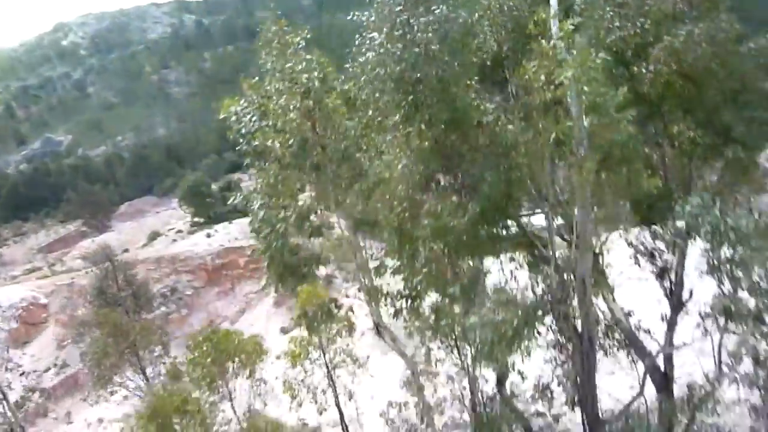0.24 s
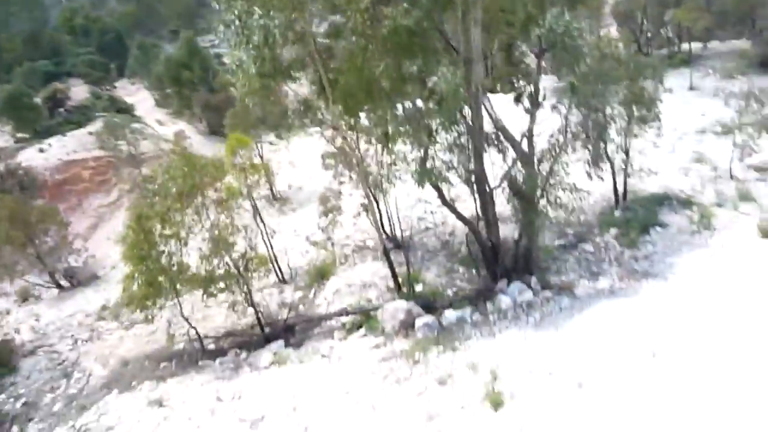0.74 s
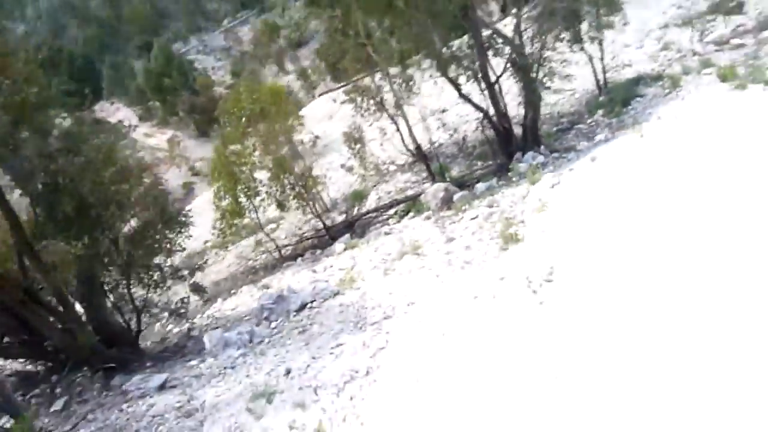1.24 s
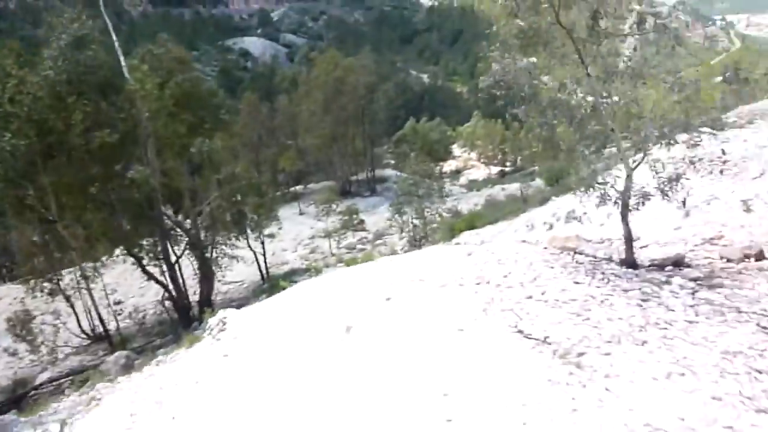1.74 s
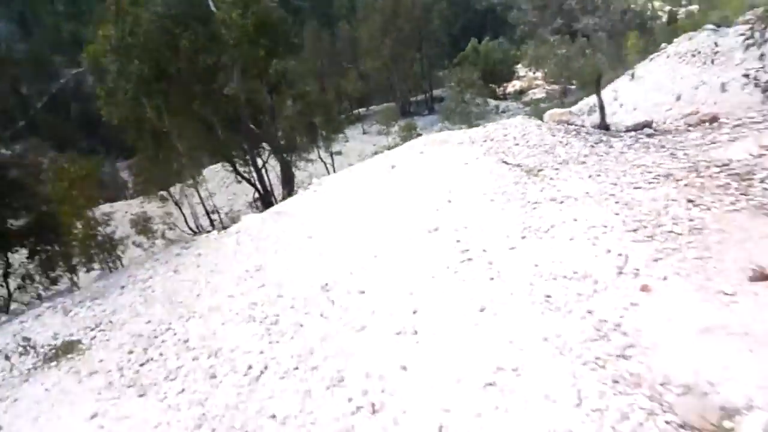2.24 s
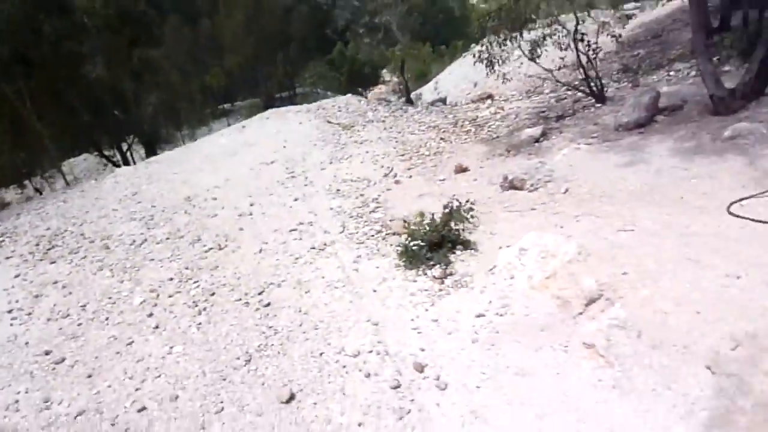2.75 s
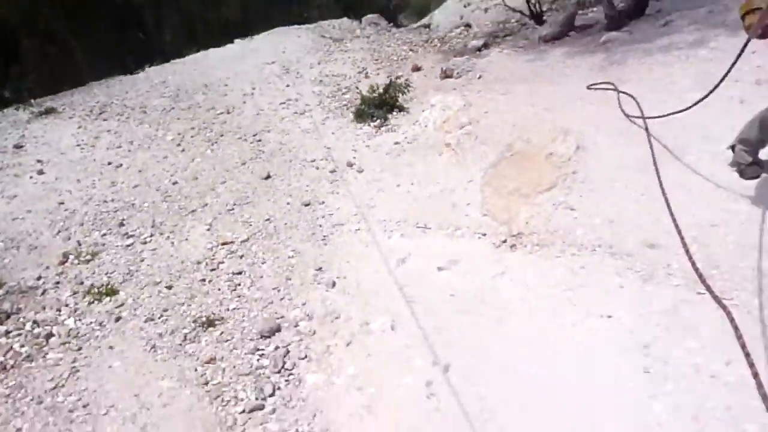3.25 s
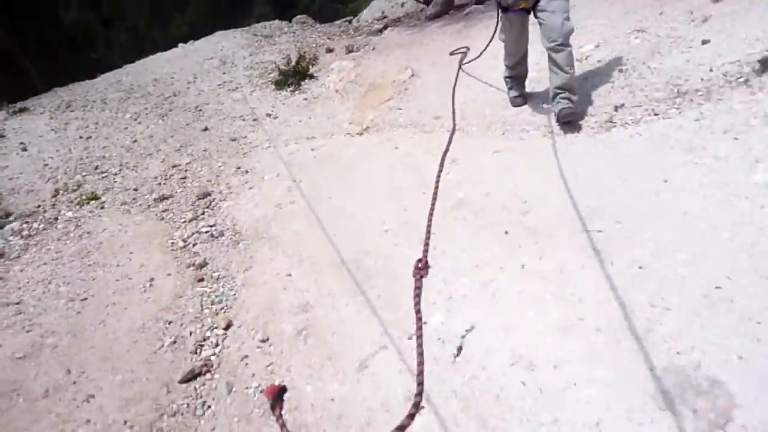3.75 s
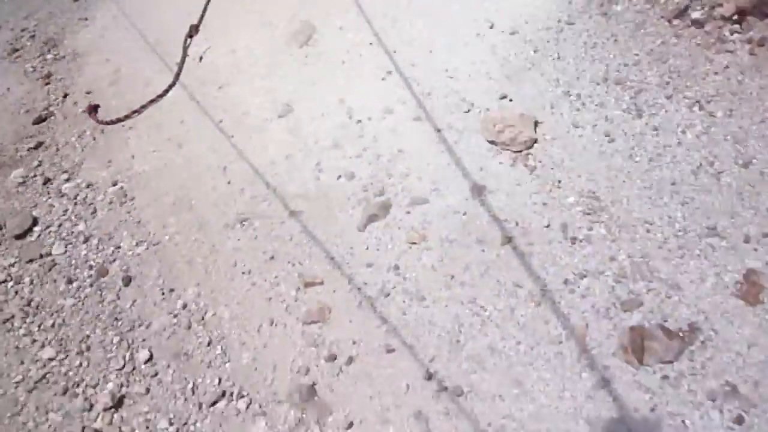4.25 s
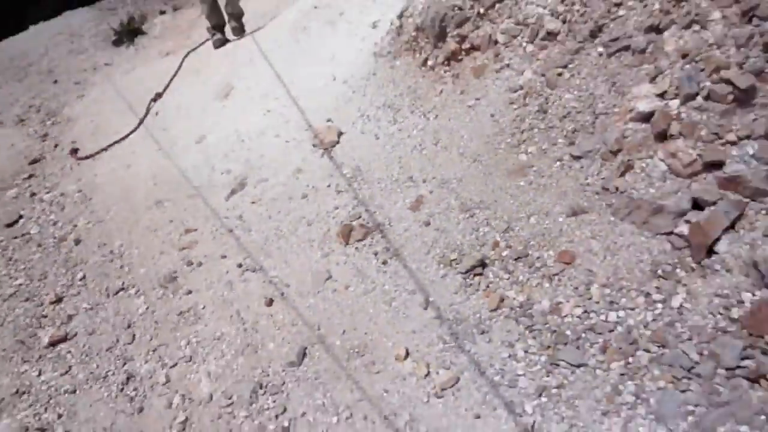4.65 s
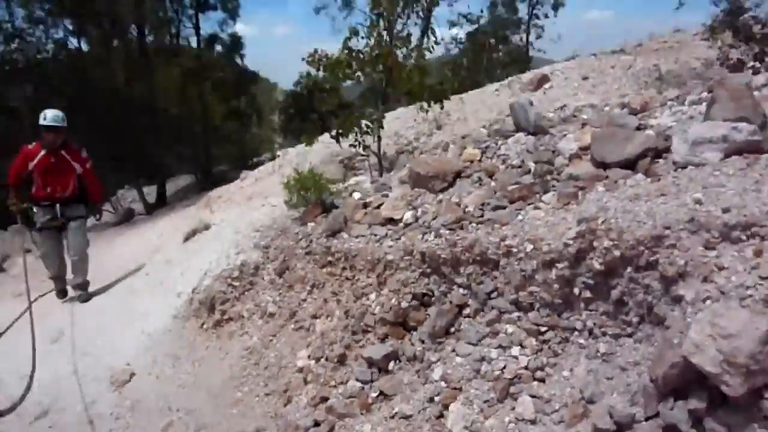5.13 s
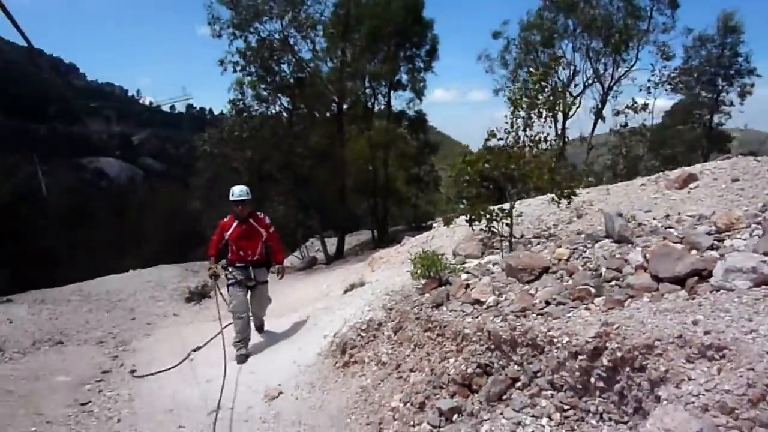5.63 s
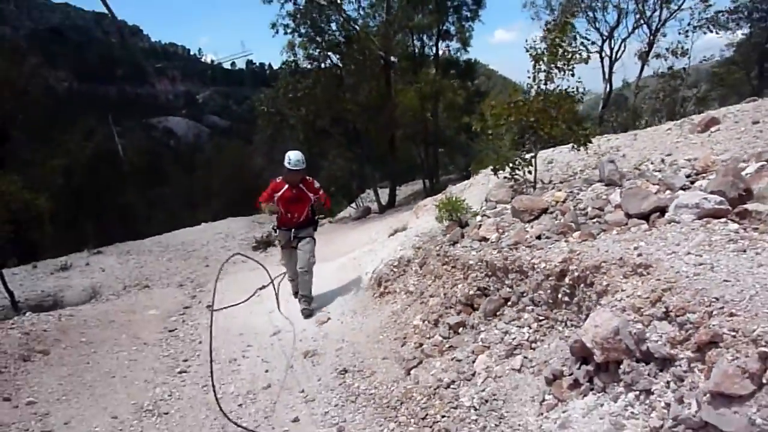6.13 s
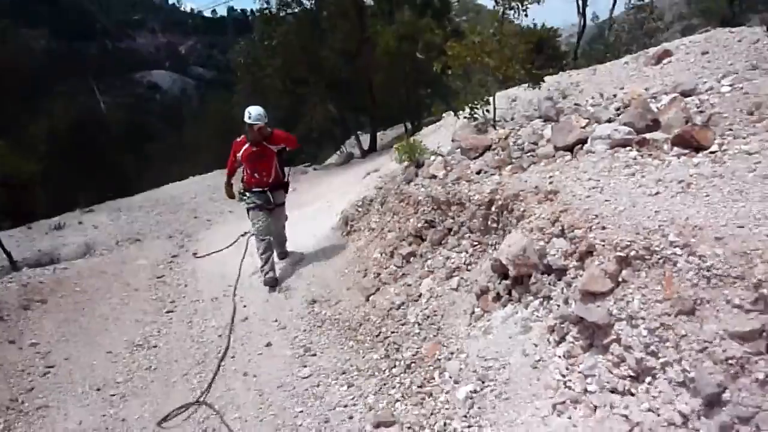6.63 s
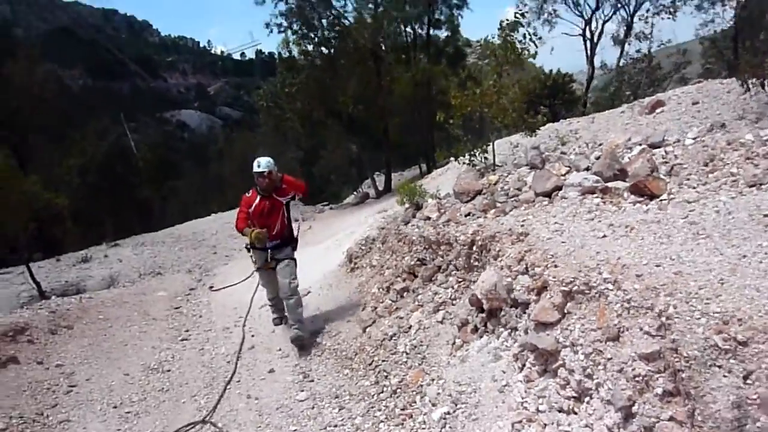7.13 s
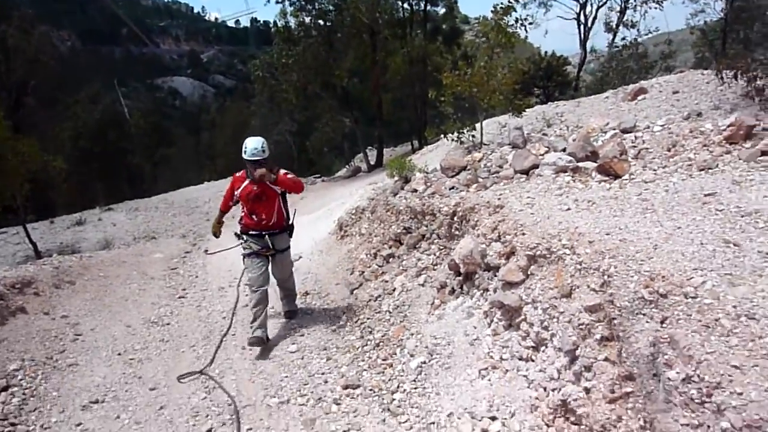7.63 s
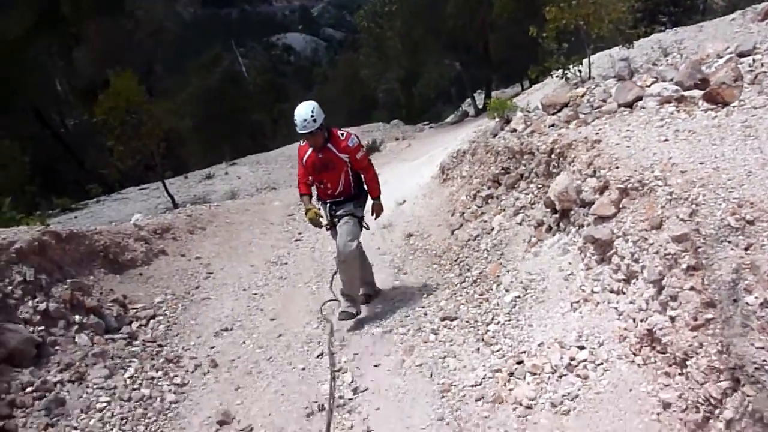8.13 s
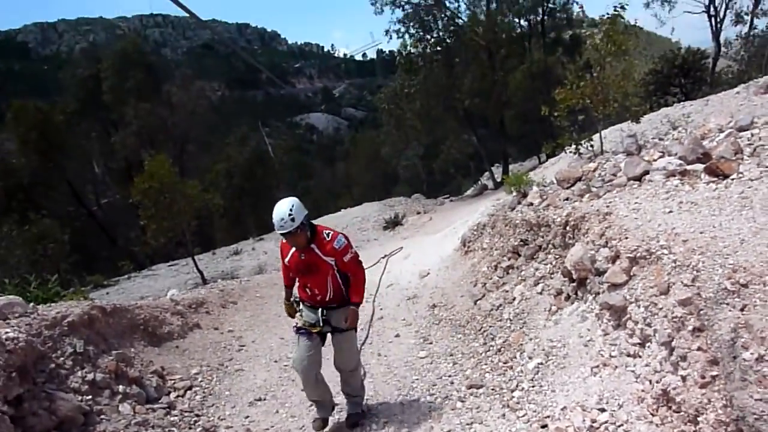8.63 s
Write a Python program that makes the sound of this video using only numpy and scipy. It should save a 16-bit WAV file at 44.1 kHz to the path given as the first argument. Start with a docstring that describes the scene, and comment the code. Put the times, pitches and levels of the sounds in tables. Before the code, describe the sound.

Close to the microphone, a metal pulley trolley runs fast on a stranded cable with a bright rasping hiss and a falling whine. Wind buffets in lumps, then eases. Thin high squeaks appear, loose harness gear rattles dully, and the rolling slows to a grainy ratchet. Wind returns while single clicks and hollow tocks end the ride on an open hillside.

```python
"""A pulley trolley slows down along a stranded steel cable, close to a two-port microphone.
From the start its sheaves bump over the strands: a falling whine of harmonics and a rasp of pulsed noise and dense
ticks through steel resonances. Gusty wind, lumpy filtered noise, buffets the ports and then eases. From 2.2 s wavering
sines squeak on the rims, and rough contact rings now and then; from 4.1 to 4.9 s harness gear rattles on the camera
body in dull thuds. The wind is back at 6.1 s, and slow rolling ends in single noise clicks and hollow frame tocks."""
import sys
import numpy as np
from scipy import signal
from scipy.fft import rfft, irfft, next_fast_len
from scipy.io import wavfile
from scipy.ndimage import uniform_filter1d, map_coordinates

SR = 44100
rng = np.random.default_rng(int(sys.argv[2]) if len(sys.argv) > 2 else 0)


def dump(signal):
    """Clip the signal to [-1, 1] and save it as 16-bit WAV at the path in sys.argv[1]."""
    limited = np.clip(np.atleast_2d(signal).T, -1, 1)
    pcm = np.round(limited * 32767).astype(np.int16)
    wavfile.write(sys.argv[1], SR, pcm)


def volts_from_db(level):
    """Convert decibel levels to linear amplitude ratios."""
    exponent = np.asarray(level, float) / 20
    return 10 ** exponent


N = 391608

# trolley speed counted in strands crossed: time_s, strands_per_s
STRAND_SPEED = [(0, 410), (.65, 400), (.85, 388), (1.08, 380), (1.17, 384), (1.25, 352), (1.32, 343),
                (1.42, 362), (1.55, 352), (1.62, 340), (1.75, 358), (1.9, 347), (2.09, 342), (2.38, 320),
                (2.5, 312), (2.6, 318), (2.67, 300), (2.8, 317), (2.9, 303), (2.97, 288), (3.05, 270),
                (3.13, 290), (3.2, 271), (3.3, 298), (3.38, 287), (3.52, 256), (3.55, 268), (3.6, 302),
                (3.65, 315), (3.69, 295), (3.74, 236), (3.77, 220), (3.89, 251), (3.96, 229), (4.05, 224),
                (4.18, 210), (4.3, 222), (4.45, 231), (4.55, 205), (4.68, 172), (4.77, 179), (4.9, 146),
                (5.05, 143), (5.12, 136), (5.22, 145), (5.32, 121), (5.45, 126), (5.6, 120), (5.8, 123),
                (6.1, 102), (6.2, 105), (6.6, 70), (7.05, 40), (8.88, 35)]
# how hard the sheaves press as the rider bounces and swings: time_s, rasp_db
SHEAVE_PRESS = [(0, -29.5), (.7, -28), (.95, -30.5), (1.21, -28), (1.75, -25), (2.0, -24.5), (2.03, -32),
                (2.06, -21.5), (2.16, -25.5), (2.19, -30), (2.23, -23), (2.4, -27.5), (2.94, -25),
                (3.5, -25), (3.63, -22), (3.73, -28), (3.88, -25), (4.15, -28), (4.5, -25), (4.82, -30),
                (5.05, -30.5), (5.25, -28.5), (5.45, -25.5), (5.6, -24), (5.84, -24.5), (6.08, -30),
                (6.23, -22.5), (6.43, -30.5), (6.65, -26.5), (6.85, -29.5), (7.0, -31), (7.07, -39),
                (7.25, -38), (7.4, -39.5), (7.54, -31.5), (7.76, -45), (8.01, -36), (8.2, -54), (8.38, -43),
                (8.56, -46.5), (8.66, -36), (8.88, -40.5)]


def unit(x):
    """Scale to rms 1."""
    return x / np.sqrt(np.mean(x ** 2, axis=-1, keepdims=True) + 1e-20)


def along(points, hz):
    """Read (Hz, value) points on a log frequency axis."""
    f, v = np.transpose(points)
    return np.interp(np.log(hz + 1), np.log(f + 1), v)


def curves(rows):
    """One value per sample for each column after the time."""
    s, *cols = np.transpose(rows)
    return [np.interp(np.arange(N) / SR, s, c) for c in cols]


def wobble(rate):
    """A smooth random curve, rate knots a second."""
    knots = rng.standard_normal(int(N * rate / SR) + 4)
    return map_coordinates(knots, [np.arange(N) * rate / SR])


def sides(pan_db):
    """Gains of the left and right port that lie pan_db apart."""
    return volts_from_db(np.array([pan_db, -pan_db]) / 2)


def filtered(x, response):
    """Apply a complex response of frequency to x."""
    m = next_fast_len(x.shape[-1] + 8192)
    return irfft(rfft(x, m) * response(np.fft.rfftfreq(m, 1 / SR)), m)[..., :x.shape[-1]]


def band(x, lo_hz, hi_hz):
    """Soft-edged band."""
    return filtered(x, lambda hz: 1 / np.sqrt((1 + (lo_hz / (hz + 1)) ** 8) * (1 + (hz / hi_hz) ** 16)))


def smooth_field(shape, bins, frames):
    """Random values over frequency and time, averaged over neighbouring bins and frames."""
    field = uniform_filter1d(rng.standard_normal(shape), size=bins, axis=0)
    field = uniform_filter1d(field, size=frames, axis=1)
    return field / field.std()


def gusts():
    """Wind strength and side: the steady wind plus bell-shaped gusts, added as power."""
    # steady wind on the ports: time_s, buffet_db
    steady_wind = [(0, -26), (.33, -23.5), (.62, -30), (.9, -28), (1.02, -30), (1.09, -51), (1.16, -45),
                   (1.3, -37.5), (1.56, -50), (1.64, -29), (1.685, -37), (1.72, -34.5), (2.02, -32.5),
                   (2.1, -68), (2.3, -40.5), (2.8, -48), (3.07, -69), (3.15, -42.5), (3.36, -44.5),
                   (3.5, -67), (4.1, -56), (4.5, -52), (5.0, -56), (5.94, -54.5), (6.1, -40.5), (6.3, -25),
                   (6.92, -27), (7.05, -49.5), (7.3, -31), (7.7, -30), (8.0, -29.5), (8.11, -36.5),
                   (8.18, -25.5), (8.7, -25.5), (8.77, -35), (8.88, -21.5)]
    # single gusts: time_s, peak_db, length_s (full width at 1/e of the power), left_minus_right_db
    gust_rows = [(0.416, -22.5, 0.021, -10), (0.759, -23.5, 0.052, -7), (0.885, -23, 0.031, 6),
                 (0.949, -23.5, 0.037, 2), (1.058, -25, 0.025, -1), (1.123, -29, 0.036, -2),
                 (1.191, -33, 0.042, -1), (1.358, -21.5, 0.029, 8), (1.482, -31, 0.027, 7),
                 (1.619, -22, 0.028, 0), (1.727, -25, 0.025, 4), (1.775, -23, 0.027, 4),
                 (1.921, -18, 0.015, 2), (2.227, -29.5, 0.031, -3), (2.317, -27.5, 0.017, 7),
                 (2.443, -23.5, 0.036, 7), (2.606, -27.5, 0.06, 5), (2.726, -36.5, 0.085, -3),
                 (3.54, -50, 0.035, 0), (3.753, -52, 0.08, 2), (5.324, -54, 0.085, -8),
                 (5.76, -49, 0.046, -6), (6.007, -41, 0.056, 7.5), (6.238, -26.5, 0.068, 2),
                 (6.69, -28, 0.036, -13), (6.776, -24, 0.046, -8), (6.86, -38, 0.027, -5),
                 (7.305, -28, 0.098, 0), (7.41, -28.5, 0.067, -15), (7.615, -20.5, 0.11, -3.5),
                 (7.757, -15.5, 0.066, -5), (7.85, -19, 0.082, -3), (8.211, -20, 0.054, -8),
                 (8.311, -18, 0.044, -2), (8.382, -10.5, 0.018, 0.5)]
    steady_db, = curves(steady_wind)
    t, power, side = np.arange(N) / SR, volts_from_db(2 * steady_db), np.zeros(N)
    for s, db, length, pan_db in gust_rows:
        bell = volts_from_db(2 * db) * np.exp(-(2 * (t - s) / length) ** 2)
        power = power + bell
        side = side + pan_db * bell
    return steady_db, 10 * np.log10(power), side / power


def puffs():
    """Small eddies popping: a few soft cycles of air each, different on the two ports."""
    # time_s, level_db (before a common lift), pitch_hz, left_minus_right_db
    puff_rows = [(0.407, -26, 487, -2), (0.755, -28, 600, -3), (0.88, -23, 487, -11),
                 (1.61, -18.5, 362, 8.5), (1.915, -20, 365, -8), (1.94, -18.5, 300, 3),
                 (6.693, -22.5, 760, -6), (7.419, -19, 500, 0), (7.457, -22.5, 486, -3),
                 (7.74, -27, 420, -6), (7.774, -16.5, 520, -6)]
    lift_db = 2.5
    out, t = np.zeros((2, N)), np.arange(SR // 16) / SR
    swell = np.sqrt(t / 0.0025) * np.exp(-t / 0.0048)
    for s, db, hz, pan_db in puff_rows:
        burst = band(rng.standard_normal((2, N // 100)), 0.27 * hz, 1.78 * hz)[:, :len(t)]
        gain = volts_from_db(db + lift_db) * sides(np.array([pan_db]))
        out[:, round(s * SR):][:, :len(t)] += gain * unit(burst) * swell
    return out


def wind():
    """Eddies break on the ports in lumps, some of it shared by both; slow ones press, sharp ones flutter higher."""
    # how the wind sits at the two ports: time_s, pressure_db and flutter_db (relative to the buffet, before
    # offsets), left_minus_right_db (before scaling), share_alike (0-1), late_ms (shared air, late on the left)
    port_wind = [(0, -24, 1, 3.5, 0.02, 1), (1.1, -9, 0, 1, .04, 1), (1.4, -8, -11, -4, 0, 1),
                 (1.9, -4.5, -2.5, 2.5, 0.04, 0.72), (2.8, -3.5, -12, -6.5, 0.09, 0.28),
                 (3.9, 1, -10, 1, 0.5, 0), (4.2, -11, 7, 1, 1, 0), (4.7, -7, -4, 0, 0.95, 0.036),
                 (5.0, -1, 1.5, 1, 0.9, 0.055), (5.9, 0, -2, 0, 0.93, 0), (6.1, -19, -17.5, -11, 0, .8),
                 (6.9, -12, -13, -6, 0.14, 0.67), (7.6, -19, -14, -8.5, 0.1, 0.39),
                 (8.0, -6, -13.5, 2.5, 0.06, 0.57), (8.5, -6.5, -16.5, -7.5, 0.27, 0.93),
                 (8.88, -13, -19.5, -12, 0.06, 0.99)]
    # spectrum shapes of the three layers: frequency_hz, density_db_per_hz
    buffet_shape = [(40, -19), (75, -6), (110, 0), (180, -2.5), (260, -6), (400, -17), (700, -100)]
    flutter_shape = [(120, -34), (220, -2), (320, -1), (450, -3.5), (700, -13), (1000, -21), (1500, -25),
                     (2500, -38)]
    pressure_shape = [(12, -25), (25, -3), (45, 7), (70, 7.5), (100, 5), (160, -79)]
    steady_db, buffet_db, gust_pan_db = gusts()
    pressure_db, flutter_db, pan_db, share_alike, late_ms = curves(port_wind)
    share_alike = np.clip(share_alike, 0, 1)
    source = np.clip(np.arange(N) - late_ms * SR / 1000, 0, N - 1).astype(int)
    pan_db = pan_db + gust_pan_db + 0.92 * (1 - share_alike) * wobble(6.5)

    def lumps(slow_db, fast_db):
        swell_db = [slow_db * wobble(22) + fast_db * wobble(70) for port in range(2)]
        return rng.standard_normal((2, N)) * volts_from_db(swell_db)

    def partly_shared(air):
        left = np.sqrt(1 - share_alike) * air[0] + np.sqrt(share_alike) * air[1][source]
        return np.array([left, air[1]])

    def layer(air, spectrum):
        return unit(filtered(air, lambda hz: volts_from_db(along(spectrum, hz))))

    buffet = volts_from_db(0.5) * layer(partly_shared(lumps(slow_db=2.0, fast_db=2.1)), buffet_shape)
    flutter = volts_from_db(flutter_db + 2.5) * layer(partly_shared(lumps(slow_db=1.5, fast_db=3.0)), flutter_shape)
    air = lumps(slow_db=3.0, fast_db=0.5)
    held_back = 0.34  # dB by which the pressure lags behind each dB of a gust's rise
    pressure_db = pressure_db + 3.0 - held_back * (buffet_db - steady_db)
    pressure = volts_from_db(pressure_db) * layer(air + 0.099 * air[::-1], pressure_shape)
    return volts_from_db(buffet_db) * (pressure + (buffet + flutter) * sides(0.77 * pan_db)) + puffs()


def knocks():
    """Harness gear on the camera body: a short dull thud and a rattle each, alike at both ports."""
    # time_s, level_db, pitch_hz
    knock_rows = [(4.13, -31, 287), (4.146, -27, 657), (4.179, -24, 403), (4.198, -25, 780),
                  (4.218, -32, 750), (4.244, -27, 735), (4.27, -24, 403), (4.301, -27, 676),
                  (4.337, -29, 807), (4.355, -28, 974), (4.399, -16.5, 460), (4.434, -24, 484),
                  (4.447, -18.5, 720), (4.469, -27, 218), (4.586, -29, 460), (4.606, -26, 603),
                  (4.619, -14.5, 595), (4.632, -20, 630), (4.648, -21, 544), (4.666, -22.5, 380),
                  (4.691, -22, 999), (4.719, -19.5, 627), (4.73, -22.5, 563), (4.74, -23, 554),
                  (4.761, -26, 363), (4.81, -29, 869), (4.828, -31, 444), (4.918, -31, 402)]
    decay_cycles, rattle_db, rattle_decay_s = 2.3, -10, 0.018
    out, t = np.zeros(N), np.arange(SR // 16) / SR
    for s, db, hz in knock_rows:
        thud = -np.sin(2 * np.pi * hz * t) * np.exp(-t * hz / decay_cycles) * np.minimum(t * hz, 1)
        rattle = unit(band(rng.standard_normal(len(t)), 0.37 * hz, 1.7 * hz)) * np.exp(-t / rattle_decay_s)
        out[round(s * SR):][:len(t)] += volts_from_db(db) * (thud + volts_from_db(rattle_db) * rattle)
    return band(out, 170, 3000)


def contact(strands):
    """Rough wires: noise pulsing once a strand plus ticks that grow sparser and stand out more as speed falls."""
    phase = 2 * np.pi * np.cumsum(strands * (1 + .02 * wobble(30))) / SR
    beat = 1 + 0.41 * np.cos(phase)
    grind = rng.standard_normal(N) * beat * volts_from_db(0.81 * wobble(60))
    rate = (250 + 9.5 * strands) / SR  # mean ticks per sample
    struck = rng.random(N) < rate * beat
    ticks = struck * rng.standard_normal(N) * volts_from_db(2.5 * rng.uniform(-1, 1, N)) / np.sqrt(rate)
    share = np.clip(.6 - 0.001 * strands, 0, 1)
    return np.sqrt(1 - share) * grind + np.sqrt(share) * ticks


def rings(strands):
    """Rough contact through broad resonances, each swelling and fading."""
    # start_s, end_s, pitch_hz, width_hz (of each of two passes), level_db (before a common wobble)
    ring_rows = [(0, 0.99, 4800, 350, -45), (2, 2.2, 5700, 350, -47), (4.3, 5.0, 1800, 320, -46),
                 (5.1, 5.7, 2890, 650, -36), (2.248, 3.1, 5200, 300, -32.5), (1.5, 2.3, 1690, 160, -45),
                 (2.5, 3.9, 1644, 190, -39), (3, 3.8, 3200, 500, -35), (5.5, 5.4, 1550, 370, -39.5),
                 (5, 5.953, 3330, 700, -33.5), (5, 5.85, 5180, 420, -33.5), (6, 6.4, 5100, 380, -29),
                 (7.082, 7.5, 3250, 400, -47), (8, 8.3, 3300, 300, -43.5), (8.5, 8.87, 3200, 350, -47)]
    swell_s = 0.094
    t, rough, out = np.arange(N) / SR, contact(strands), np.zeros(N)
    for start, end, hz, width, db in ring_rows:
        span = slice(round(start * SR), round(end * SR))
        resonance = lambda f: (1j * f * width / (hz * hz - f * f + 1j * f * width)) ** 2
        tone = unit(filtered(rough[span], resonance))
        swell = np.clip(np.minimum(t[span] - start, end - t[span]) / swell_s, 0, 1)
        out[span] += volts_from_db(db) * swell * tone
    return out * volts_from_db(0.56 * wobble(12))


def song():
    """A sheave sings: rim modes rubbed into narrow, rough, fluttering tones."""
    # faint long tones and short squeaks: start_s, end_s, pitch_hz, level_db (before grip and flutter)
    song_rows = [(2.2, 2.25, 12880, -43), (2.3, 2.38, 12880, -45), (2.48, 2.535, 9820, -29),
                 (2.55, 2.8, 9820, -37), (2.58, 2.65, 12880, -45), (2.67, 2.83, 12880, -41),
                 (2.865, 2.985, 12880, -39), (2.91, 3.02, 9820, -29), (3.02, 3.08, 9820, -35),
                 (3.3, 3.365, 12880, -45), (5.03, 5.4, 9820, -38), (5.245, 5.28, 9820, -32),
                 (4.7, 6.0, 15035, -55), (4.7, 6.0, 14600, -58), (5.5, 5.555, 15035, -47),
                 (5.93, 5.98, 15035, -47), (5.92, 7.05, 7685, -37), (5.92, 7.0, 12880, -49),
                 (5.935, 5.975, 9815, -30), (5.935, 5.98, 7685, -30), (5.96, 6.03, 12880, -44),
                 (6.11, 6.33, 9815, -37), (6.2, 6.235, 12880, -41), (6.21, 6.255, 6955, -26),
                 (6.215, 6.25, 9815, -27), (6.235, 6.262, 7685, -31), (6.285, 6.335, 7685, -26),
                 (6.285, 6.35, 12880, -44), (6.345, 6.385, 7685, -29), (6.445, 6.475, 7685, -31),
                 (6.44, 6.48, 12880, -45), (6.525, 6.625, 7685, -30), (6.54, 6.6, 12880, -41),
                 (6.555, 6.61, 9815, -31), (6.54, 6.86, 6955, -34), (6.615, 6.655, 6955, -25),
                 (6.66, 6.7, 6955, -27), (6.66, 6.745, 12880, -43), (6.665, 6.692, 7685, -32),
                 (6.705, 6.757, 7685, -26), (6.71, 6.745, 6955, -26), (6.62, 6.85, 9815, -39),
                 (6.73, 6.765, 9815, -33), (6.64, 6.76, 15035, -51), (6.775, 6.8, 7685, -32),
                 (6.82, 6.845, 7685, -30), (6.99, 7.028, 7685, -33)]
    swell_s = .012
    out = np.zeros(N)
    grip_db = 3 * wobble(28) - 1  # the rim grips and lets go, all modes together
    drift_hz, flutter_db = 22 * wobble(60), 2 * wobble(70)
    shifts = rng.integers(N, size=len(song_rows))  # each tone reads its own stretch of drift and flutter
    for (start, end, hz, db), shift in zip(song_rows, shifts):
        n = np.arange(round(start * SR), round(end * SR))
        swell = np.clip(np.minimum(n / SR - start, end - n / SR) / swell_s, 0, 1)
        phase = 2 * np.pi * np.cumsum(hz + drift_hz[n - shift]) / SR
        level_db = db + grip_db[n] + flutter_db[n - shift]
        out[n] += swell * volts_from_db(level_db) * np.sqrt(2) * np.sin(phase)
    return out


def tocks():
    """The frame knocks as a strand passes under the rear sheave: a short hollow ring each."""
    # time_s, level_db (before a common lift), pitch_hz
    tock_rows = [(7.1735, -35, 1220), (7.1865, -28, 1100), (7.2897, -28, 1130), (7.3192, -27, 1130),
                 (7.414, -24, 931), (7.4664, -33, 1110), (7.4908, -34, 1150), (7.5297, -32, 1110),
                 (7.6315, -36, 1126), (7.6814, -29, 945), (7.7443, -35, 1080), (7.7617, -34, 977),
                 (7.7837, -31, 902), (7.8106, -32, 1100), (7.865, -36, 945), (7.8886, -32, 999),
                 (7.9119, -27, 1150), (7.9343, -32, 902), (7.9578, -38, 1060), (7.9807, -33, 1100),
                 (8.0151, -38, 1210), (8.027, -29, 1163), (8.08, -30, 974), (8.2142, -44, 934),
                 (8.2406, -35, 1110), (8.286, -29, 1080), (8.3309, -35, 1030), (8.4222, -28, 1170),
                 (8.4821, -33, 1290), (8.5185, -32, 1010), (8.5699, -34, 1050), (8.6033, -33, 1260),
                 (8.6193, -28, 1200), (8.6622, -31, 1040), (8.6806, -27, 1250), (8.725, -30, 1100),
                 (8.7594, -31, 1210), (8.7969, -30, 1120), (8.8243, -25, 1210), (8.8512, -26, 1230)]
    lift_db, t60_s, attack_s = 1.0, 0.02, 0.00057
    out, t = np.zeros(N + SR), np.arange(SR // 20) / SR
    for s, db, hz in tock_rows:
        envelope = volts_from_db(db + lift_db - 60 * t / t60_s) * (1 - np.exp(-t / attack_s))
        out[round(s * SR):][:len(t)] += envelope * np.sin(2 * np.pi * hz * t)
    return out[:N]


def steel(hz):
    """Response of the trolley: broad colour with its resonances on top."""
    # broad colour of the rasp: frequency_hz, density_db_per_hz
    colour = [(240, -70), (400, -40), (528, -33), (588, 4.5), (730, -2), (1580, -7), (2100, -3),
              (3210, -4.5), (4180, -6), (5270, 0.5), (10200, -1), (14800, -11), (16000, 12.5)]
    # broad resonances of sheaves and frame: centre_hz, width_hz, level_db (over the colour)
    resonances = [(1210, 440, -7.5), (1556, 290, 1), (3110, 1080, 0.5), (5070, 570, -1), (6790, 1180, 0),
                  (8970, 270, -7.5), (10020, 280, -9.5), (12130, 610, -8)]
    modes = sum(volts_from_db(db) * 1j * hz * w / (c * c - hz * hz + 1j * hz * w) for c, w, db in resonances)
    return volts_from_db(along(colour, hz)) * (1 + modes)


def strand_drops():
    """The hard clicks, and late on softer ones filling the gaps at a pace set by the speed."""
    # the hardest single strands as the trolley slows: time_s, level_db (before the steel)
    hard = [(5.9054, -11), (6.0746, -11), (6.0912, -15), (6.1431, -11), (6.2529, -7), (6.3929, -15),
            (6.4686, -13), (6.8278, -12), (6.9584, -17), (7.0155, -15), (7.0377, -17), (7.1031, -20),
            (7.1213, -15), (7.1454, -16), (7.17, -18), (7.1974, -20), (7.2064, -21), (7.22, -19),
            (7.2306, -21), (7.2465, -18), (7.2718, -16), (7.3005, -20), (7.3307, -15), (7.3438, -22),
            (7.3609, -17), (7.3919, -20), (7.4056, -22), (7.4239, -16), (7.4551, -16), (7.4765, -9),
            (7.4999, -14), (7.518, -15), (7.5381, -14), (7.558, -15), (7.5777, -15), (7.5973, -12),
            (7.6174, -16), (7.6665, -22), (7.6916, -19), (7.7058, -19), (7.7256, -18), (7.7378, -22),
            (7.7569, -21), (7.791, -17), (7.8055, -22), (7.833, -21), (7.8473, -20), (7.8957, -18),
            (7.9432, -18), (7.9653, -18), (8.0112, -18), (8.0226, -15), (8.0609, -15), (8.0885, -23),
            (8.1198, -24), (8.1368, -14), (8.1599, -14), (8.1804, -29), (8.205, -21), (8.254, -23),
            (8.3038, -24), (8.3242, -28), (8.3454, -17), (8.378, -17), (8.4036, -19), (8.4322, -22),
            (8.4618, -16), (8.473, -24), (8.4963, -17), (8.5337, -18), (8.5695, -18), (8.6018, -16),
            (8.6296, -17), (8.6588, -18), (8.6721, -16), (8.6888, -16), (8.6981, -19), (8.7111, -13),
            (8.7789, -19), (8.8153, -22), (8.8345, -17), (8.8608, -16)]
    creep_s = 7  # from here on the softer strands are heard one by one
    soft_per_strand = 2.2  # both sheaves and stray wires tick in between
    follow, spread_db, scatter_s = .65, 2, .0015  # follow: click dB per dB of rasp
    speed_s, speed = np.transpose(STRAND_SPEED)
    soft = []
    for (start, _), (end, _) in zip(hard, hard[1:] + [(N / SR - .002, 0)]):
        steps = max(round((end - start) * soft_per_strand * np.interp(start, speed_s, speed)), 1)
        if start > creep_s:
            soft += list(np.linspace(start, end, steps + 1)[1:-1])
    luck = rng.standard_normal((len(soft), 2))
    soft_db = follow * np.interp(soft, *np.transpose(SHEAVE_PRESS)) + spread_db * luck[:, 1]
    return list(hard) + list(zip(soft + scatter_s * luck[:, 0], soft_db))


def clicks():
    """Each strand dropping through the groove: a sharp crack, a second sheave just after, a short rattle."""
    # colour of a single click against the rasp: frequency_hz, level_db
    click_colour = [(600, -14), (1000, 0), (2000, -11), (3250, 0.5), (4250, -7), (5100, -2), (6500, -2.5),
                    (10000, -6), (15000, -12)]
    crack = 2.5  # the first touch of a click over its rattle
    blows, t = np.zeros(N + SR), np.arange(SR // 40) / SR
    first = volts_from_db(-60 * t / .008)
    second = .22 * (t > .003) * volts_from_db(-60 * (t - .003) / .005)
    tail = .13 * volts_from_db(-60 * t / .028)
    shape = np.minimum(t / .0001, 1) * (first + second + tail)
    onset = SR // 1000  # the first millisecond sets the level
    for s, db in strand_drops():
        blow = shape * rng.standard_normal(len(t)) + crack * (np.arange(len(t)) == 4)
        blow *= np.linalg.norm(shape[:onset]) / np.linalg.norm(blow[:onset])
        blows[round(s * SR):][:len(t)] += volts_from_db(db) * blow
    return volts_from_db(1.5) * filtered(blows[:N], lambda hz: steel(hz) * volts_from_db(along(click_colour, hz)))


def whine(strands):
    """Regular bumps over the strands: five unsteady harmonics, the top two weaker at low speed."""
    # strength of the bumps: time_s, level_db
    bump_rows = [(0, -54), (.7, -48), (1.3, -47), (1.8, -49), (2.5, -45), (3.1, -42), (3.9, -41.5),
                 (4.5, -46), (5, -45), (5.9, -45), (6.4, -70), (8.88, -80)]
    # how the frame answers them: frequency_hz, gain_db
    frame_answer = [(110, -8), (300, -14), (400, -7), (560, -16), (720, -5), (900, -6), (1150, 1),
                    (1400, -3), (1600, -10)]
    bump_db, = curves(bump_rows)
    phase = 2 * np.pi * np.cumsum(strands * (1 + .005 * wobble(25))) / SR
    out = np.zeros(N)
    for k in range(1, 6):
        weaker_db = 5 * max(k - 3.5, 0) * (strands < 240)
        level_db = bump_db + along(frame_answer, k * strands) - weaker_db + 2.5 * wobble(6)
        out += volts_from_db(level_db) * np.sin(k * phase + k * k)
    return out


def patchy(x, quick_db, slow_db):
    """Resonances swell and fade in patches as the trolley rocks and the rider turns."""
    z = signal.stft(x, nperseg=512)[2]
    quick = smooth_field(z.shape, bins=7, frames=16)
    slow = smooth_field(z.shape, bins=9, frames=150)
    return signal.istft(z * volts_from_db(quick_db * quick + slow_db * slow), nperseg=512)[1][:N]


def rolling(strands):
    """Each part of the trolley rings from the shared contact and from its own loose rattle."""
    # slower rolling moves the sound from the rims into the frame: strands_per_s, then levels over the rasp
    # before offsets and wobble: low_frame_db, upper_frame_db, side_plates_db, top_db, low_growl_db
    tone_rows = [(34.6, -6.5, -4.5, 0.5, -54, -7), (41.73, -13, -16, -5, -41, -13.5),
                 (57.52, -13.5, -13.5, -5, -11, -15.5), (98.1, -11, -16, -3.5, -21, -19),
                 (119.6, -8.5, -19, -6.5, -11.5, -17.5), (139, -4, -11.5, 1.5, -7, -15.5),
                 (213, -7.5, -8, -4.5, -5, -24), (296, -13, -16.5, -4.5, -2, -33),
                 (317, -12.5, -25, -4.5, 1, -26), (363, -19.5, -19, -8, -7, -40),
                 (380, -20, -39, -4.5, -4, -38), (408, -29, -15.5, -8, -4, -30)]
    rasp_db, = curves(SHEAVE_PRESS)
    speed, *shares = np.transpose(tone_rows)
    levels = [np.interp(strands, speed, db) + 0.6 * wobble(7.3) for db in shares]
    frame_db, upper_db, plate_db, top_db, growl_db = levels
    shared = contact(strands)

    def part(lo_hz, hi_hz, own):
        return unit(band(filtered(shared + own * contact(strands), steel), lo_hz, hi_hz))

    sound = volts_from_db(-0.14 + 0.25 * wobble(30)) * part(4180, 10360, own=0.91)  # the rims
    sound += volts_from_db(plate_db - 4.0) * part(3070, 4350, own=0.93)
    sound += volts_from_db(frame_db - 0.3) * part(1020, 1843, own=1.7)
    sound += volts_from_db(upper_db) * part(1960, 2570, own=2.5)
    sound += volts_from_db(top_db + 0.89 * wobble(13) + 1.2 * wobble(35)) * part(9100, 13460, own=0.98)
    sound += volts_from_db(growl_db) * unit(band(contact(strands), 520, 950))
    return volts_from_db(rasp_db) * patchy(sound, quick_db=0.79, slow_db=1.19)


def blurred(x):
    """The same sound by ever-changing paths: phases drift over frequency and time."""
    z = signal.stft(x, nperseg=256)[2]
    field = smooth_field(z.shape, bins=12, frames=30)
    return signal.istft(z * np.exp(1j * np.pi * field), nperseg=256)[1][:N]


def ports(x):
    """The trolley reaches the left port a little early; reflections blur the likeness in the treble."""
    # phase by which the left port leads: frequency_hz, lead_rad
    lead = [(300, 0.066), (2600, 0.022), (4700, 0.81), (7500, 1.16), (8700, 1.6), (12000, 1.9),
            (15000, 1.84)]
    # level between the ports: frequency_hz, left_minus_right_db
    lean = [(500, 1.5), (1300, 1.5), (2400, 0.5), (4400, -0.5), (8000, -1), (15000, 4.5)]
    # left-right likeness: frequency_hz, likeness (0-1)
    alike = [(700, 0.98), (1500, 1), (3000, 0.95), (4500, .93), (6000, 0.88), (10000, 0.85), (15000, 0.75)]
    sign = np.array([[1], [-1]])
    turn = lambda hz: np.arccos(np.clip(along(alike, hz), 0, 1)) / 2
    place = lambda hz: volts_from_db(sign * along(lean, hz) / 2) * np.exp(1j * sign * along(lead, hz) / 2)
    direct = filtered(x, lambda hz: place(hz) * np.cos(turn(hz)))
    reflected = filtered(blurred(x), lambda hz: sign * place(hz) * np.sin(turn(hz)))
    return direct + reflected


def scene():
    """Trolley, wind and rattling gear at the two ports."""
    # the side the trolley is heard on: time_s, left_minus_right_db
    bearing = [(0, -1), (.7, -2), (1.9, -1), (3.2, -2), (4.8, -2.5), (5.7, -0.8), (8.88, -0.5)]
    # the rider's mass rounds each change of speed
    strands = uniform_filter1d(curves(STRAND_SPEED)[0], size=SR // 25, mode='nearest')
    pan_db, = curves(bearing)
    trolley = rolling(strands) + whine(strands) + clicks() + tocks() + song() + rings(strands)
    return ports(trolley) * sides(pan_db) + wind() + knocks()


def low_pass(x):
    """Removes everything above the highest recorded frequency."""
    return signal.sosfilt(signal.butter(12, 16500, fs=SR, output="sos"), x)


def record(dry):
    """The input stage rounds off the hardest gusts; the housing cuts a narrow notch and the top rolls off steeply."""
    notch_hz, notch_width_hz, notch_depth, top_hz = 7900, 170, .85, 15500
    notch = lambda hz: 1 - notch_depth / (1 + (2 * (hz - notch_hz) / notch_width_hz) ** 2)
    edge = lambda hz: 1 / (1 + (hz / top_hz) ** 90)
    rounded = dry / (1 + np.abs(dry / .75) ** 4) ** (1 / 4)
    mix = filtered(rounded, lambda hz: notch(hz) * edge(hz))
    return low_pass(mix)


dry = scene()
out = record(dry)
dump(out)
```